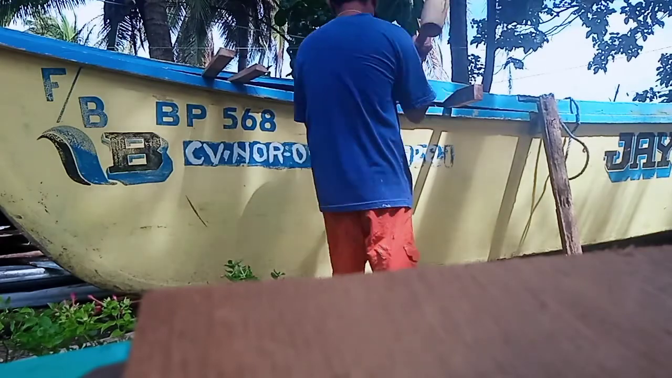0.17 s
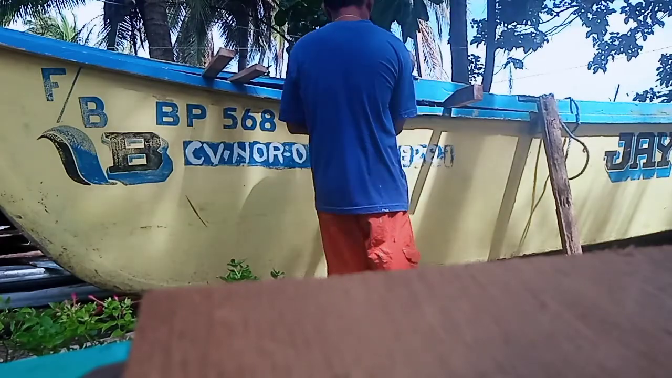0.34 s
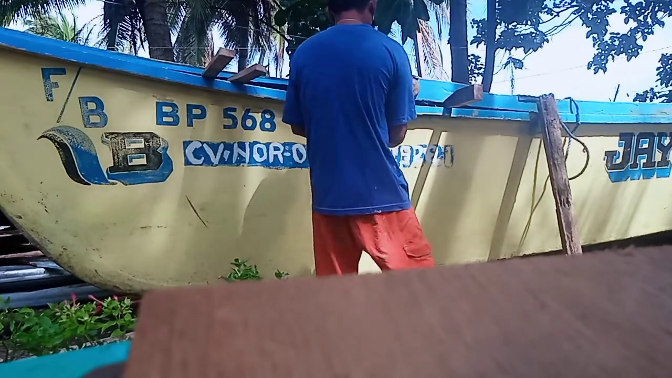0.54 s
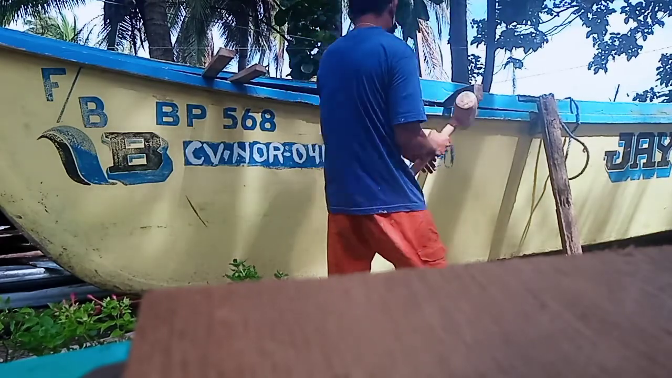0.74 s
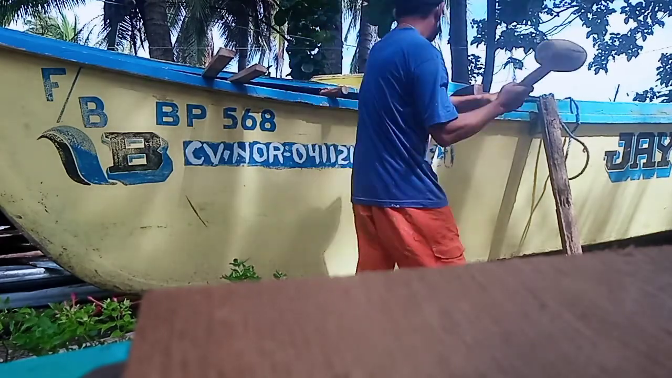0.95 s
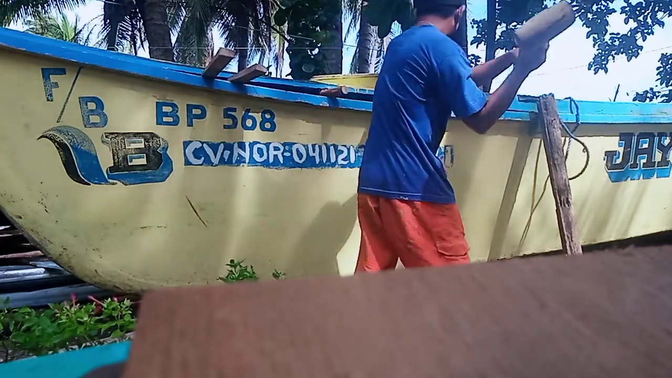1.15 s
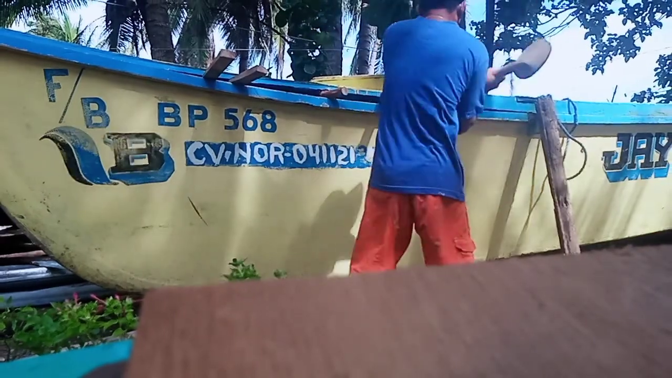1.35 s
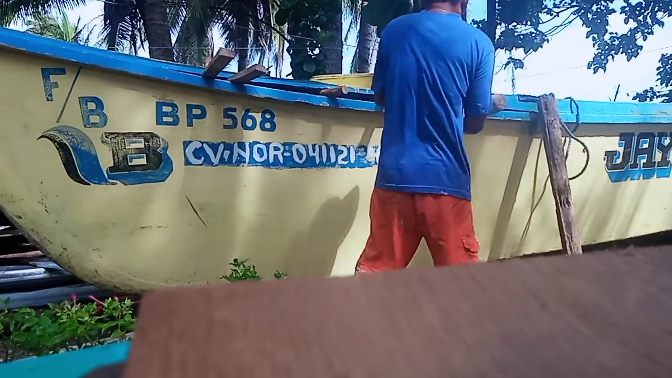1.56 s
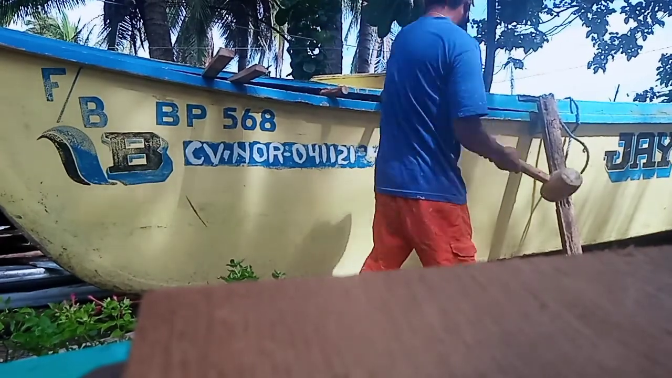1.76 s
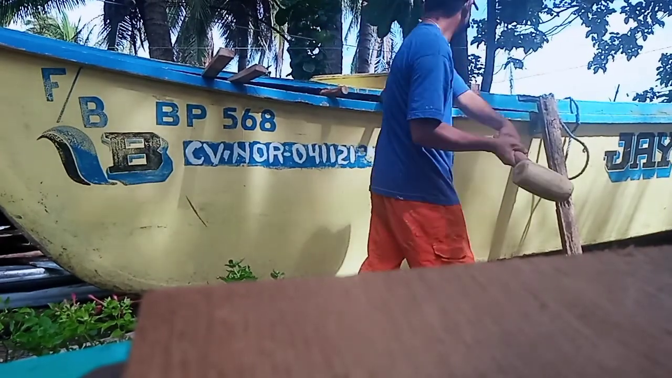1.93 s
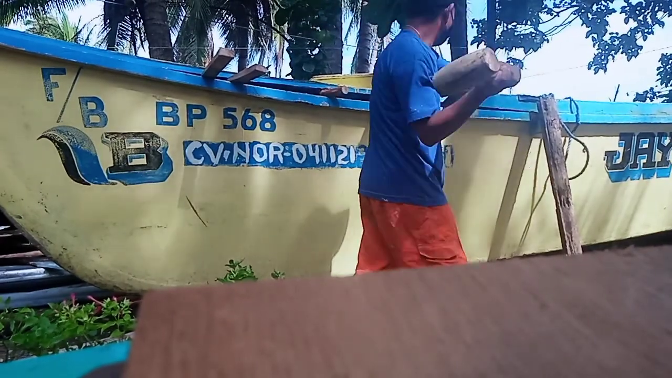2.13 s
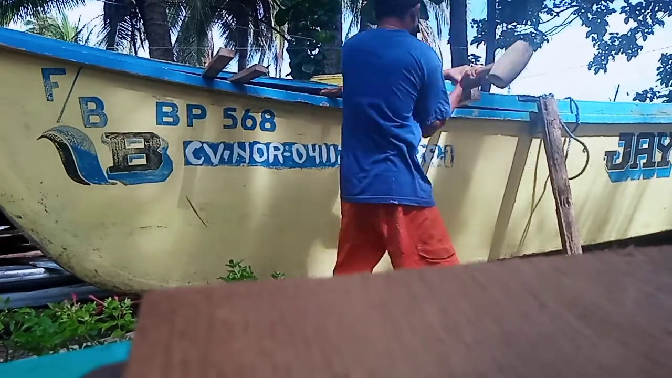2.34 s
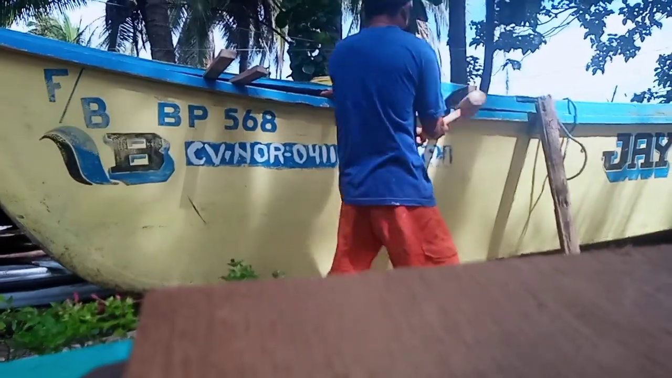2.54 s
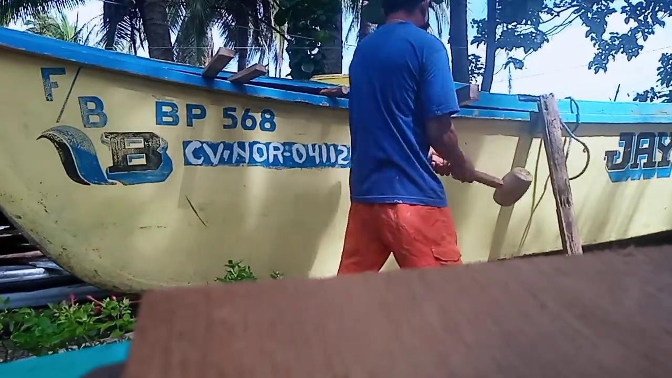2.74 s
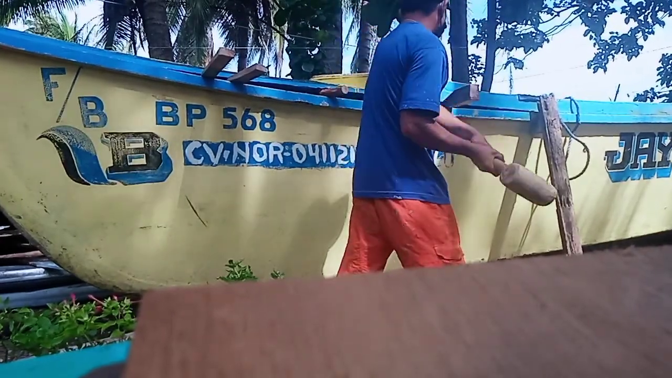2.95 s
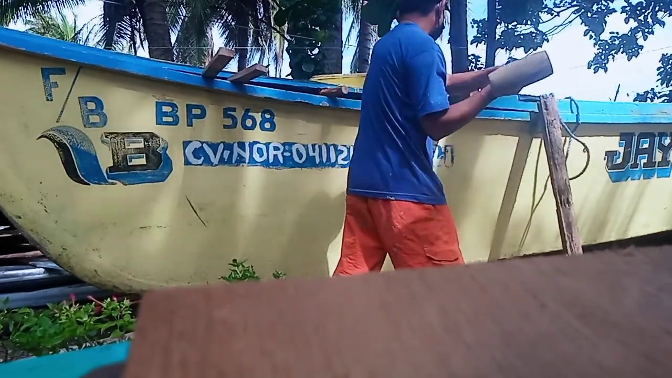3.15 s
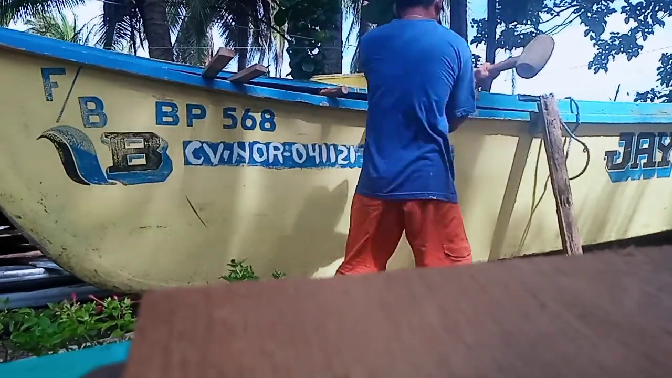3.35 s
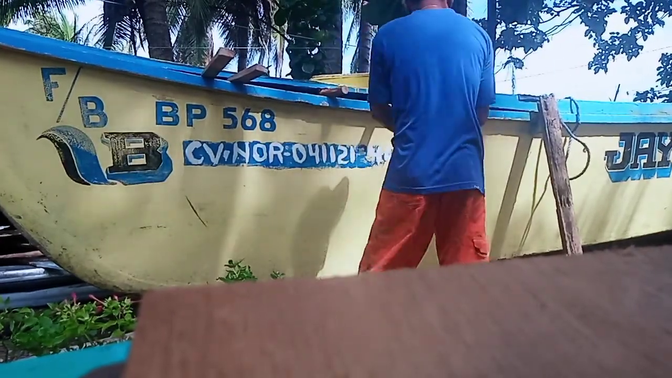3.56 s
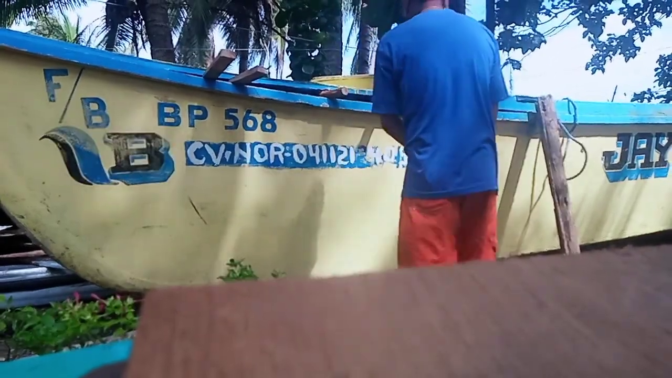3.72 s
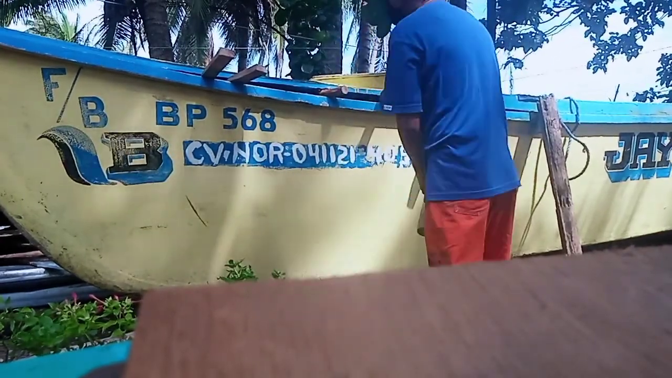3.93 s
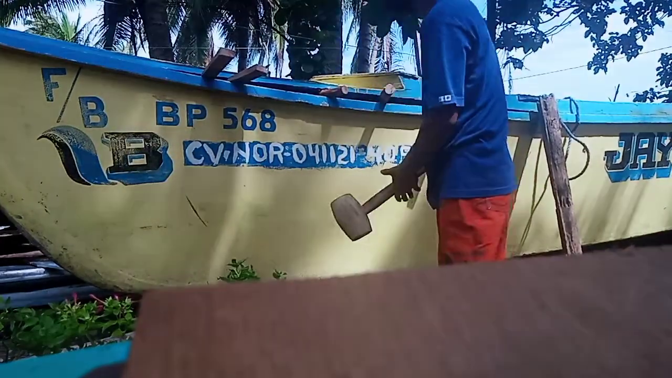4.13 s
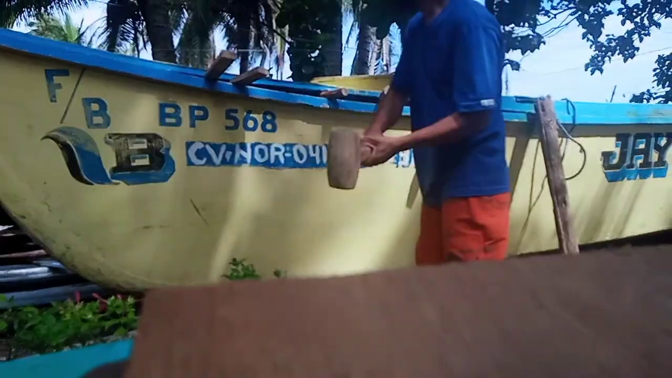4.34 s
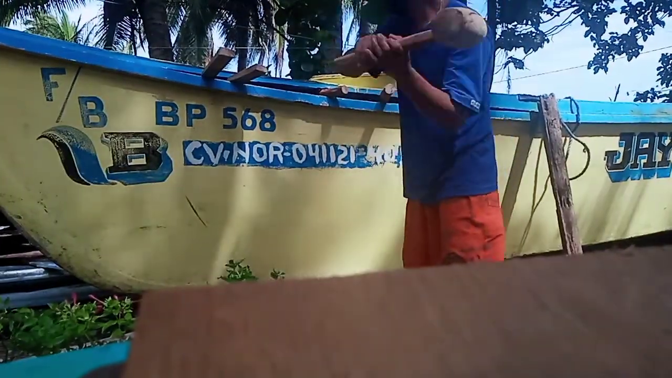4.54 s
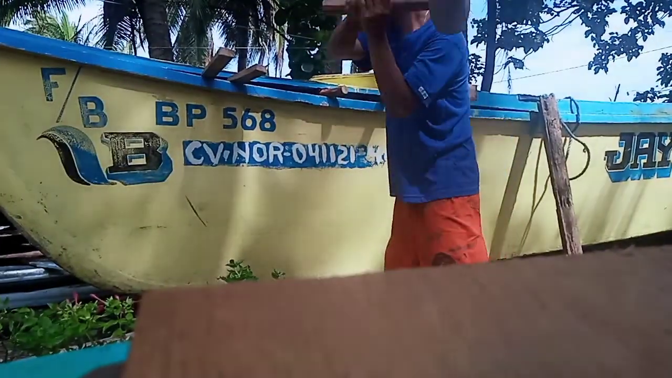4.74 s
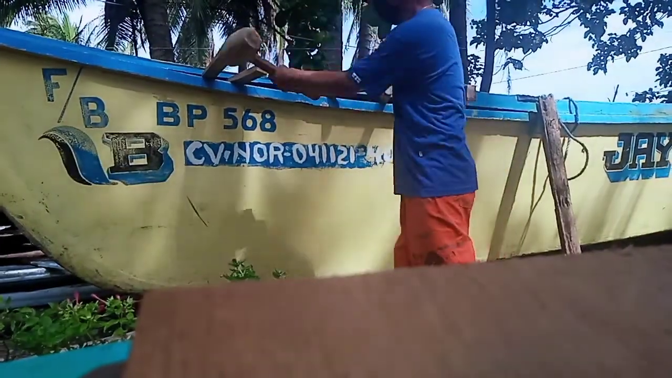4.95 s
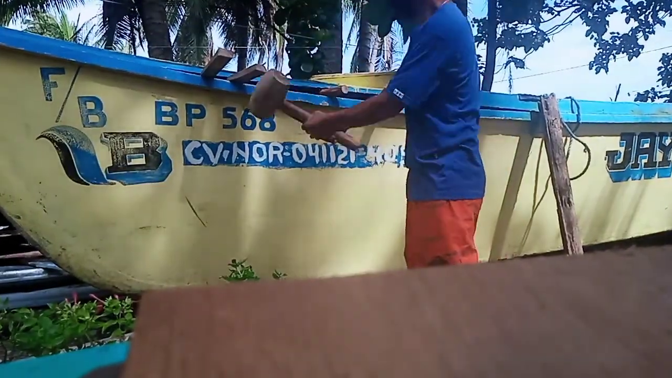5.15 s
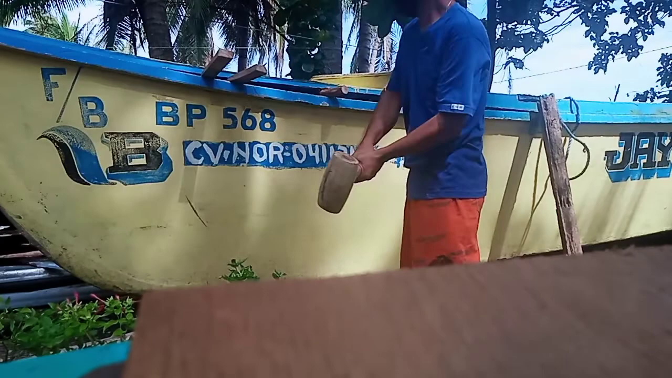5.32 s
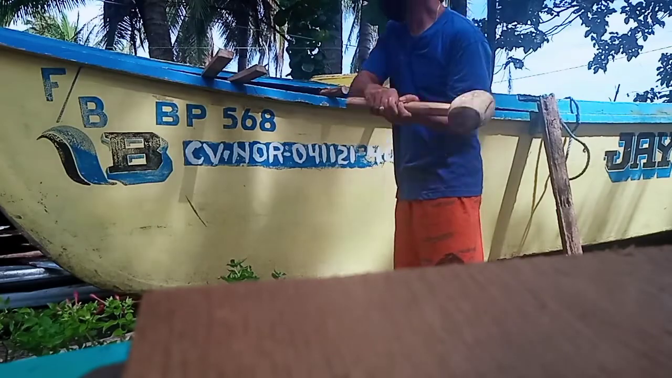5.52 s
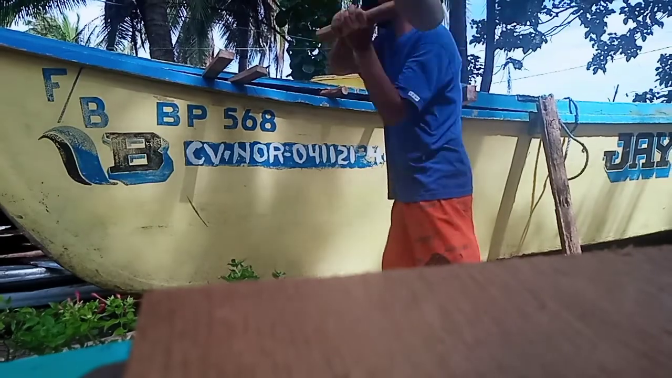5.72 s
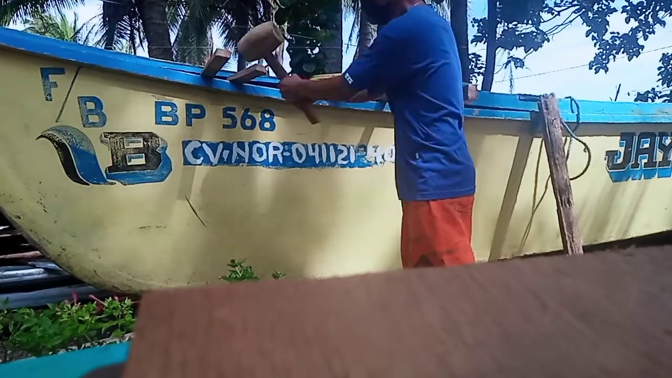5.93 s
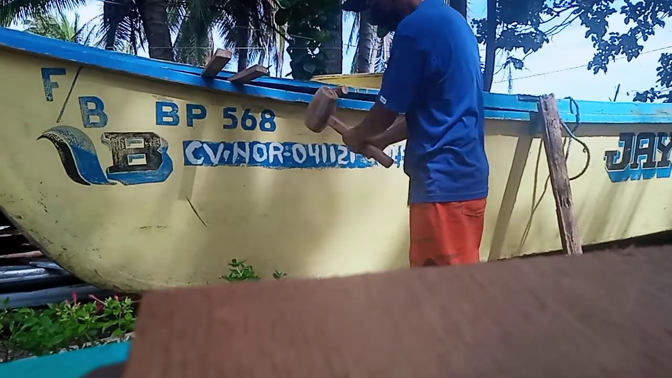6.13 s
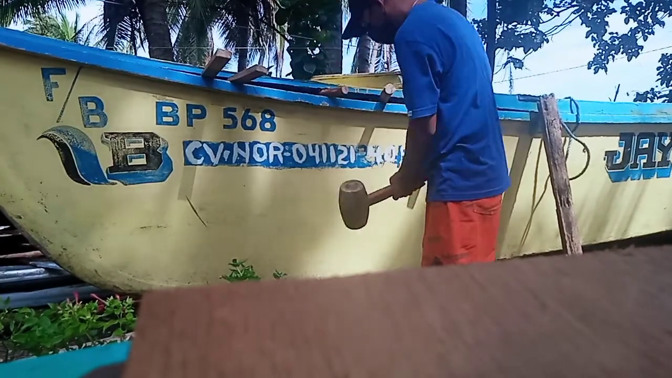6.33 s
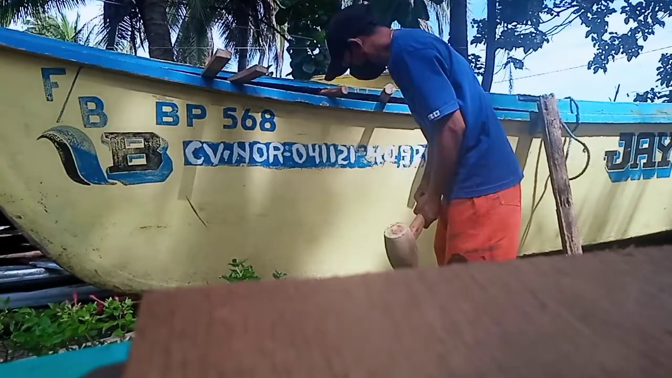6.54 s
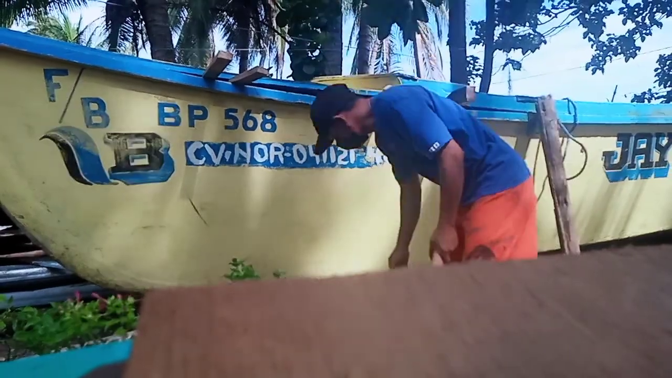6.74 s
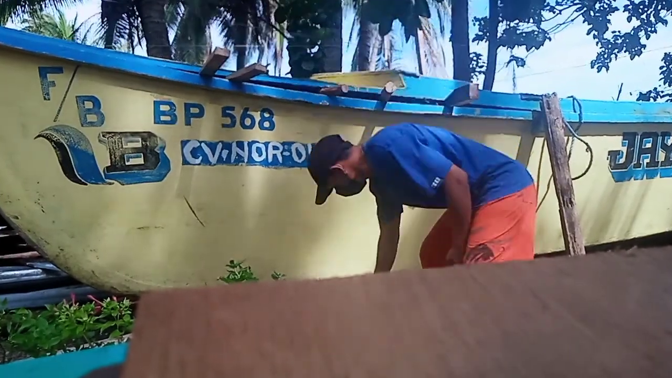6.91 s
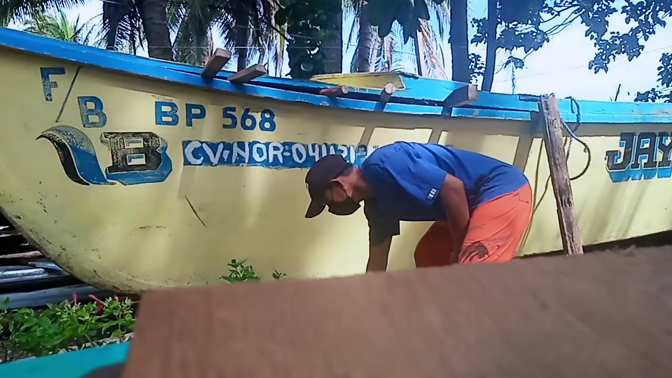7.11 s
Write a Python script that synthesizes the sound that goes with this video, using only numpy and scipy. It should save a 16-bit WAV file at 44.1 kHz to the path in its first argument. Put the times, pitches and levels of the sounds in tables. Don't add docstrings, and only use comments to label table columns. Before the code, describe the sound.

Outdoors by a shore, low surf and rustling leaves hiss quietly while small birds peep. A wooden mallet strikes a boat rail six times, roughly a second apart with a longer gap before the fifth. Each knock is hard and woody, followed by a low hull boom and a brief scattered echo. Faint fowl calls and foot scuffs fall between. A phone some metres away clips on the blows and ducks the background.

```python
import sys
import numpy as np
from scipy import signal
from scipy.fft import rfft, irfft, next_fast_len
from scipy.io import wavfile
from scipy.ndimage import uniform_filter1d

SR = 44100
rng = np.random.default_rng(int(sys.argv[2]) if len(sys.argv) > 2 else 0)


def wav_out(sig):
    wavfile.write(sys.argv[1], SR, np.round(np.clip(np.atleast_2d(sig).T, -1, 1) * 32767).astype(np.int16))


def how_loud(loudness_db):
    steps = np.asarray(loudness_db, float) / 20
    return 10 ** steps


N = 316505

# (frequency [Hz], level [dB per Hz])
SURF_COLOUR = [(15, -72), (25, -33), (69, -10), (102, -4.5), (130, 0.5), (190, -6.5), (232, -16),
               (263, -11), (296, -14), (400, -22.5), (520, -28), (880, -120)]
# (frequency [Hz], level [dB per Hz])
SHORE_COLOUR = [(240, -22.5), (400, -10), (445, -7), (560, -4), (605, -3), (749, -3.5), (1070, -2.5),
                (1220, -1), (2120, -7.5), (3680, -11.5), (4420, -19), (5650, -38.5), (7210, -34.5),
                (9500, -50), (15500, -61)]
# (time [s], strength [-])
BREEZE = [(0, .5), (.5, 0.021), (1.3, 1.9), (2.1, 1.06), (2.9, -0.18), (3.4, 0.0093), (4.0, -0.57),
          (4.6, -1.76), (5.3, -0.74), (5.9, 0.38), (6.4, 0.018), (6.85, 1.8), (7.18, 0.8)]
# (frequency [Hz], change [dB per unit of strength])
BREEZE_LIFT = [(130, -0.2), (1200, 1.33), (2500, 0.9), (3700, 1.85), (7000, 2)]

# (time [s], length [s], frequency [Hz], level [dB])
FOWL = [
    (2.129, 0.22, 1230, -46),
    (2.981, .12, 1780, -47),
    (3.248, .16, 1890, -43.5),
    (3.741, 0.23, 1675, -42),
    (3.856, 0.1, 1974, -38.5),
    (4.42, 0.2, 1190, -51),
    (6.648, 0.48, 1245, -48),
]
# (time [s], level [dB])
PEEPS = [(.02, -49.5), (0.32, -48.5), (.643, -50), (.937, -50.5), (1.355, -53), (6.19, -55), (6.5, -57)]
# (length [s], start [Hz], end [Hz], blur [Hz])
PEEP_SHAPE = (.072, 4620, 3980, 130)
# (time [s], level [dB])
CHIPS = [(.735, -53), (1.004, -51), (1.42, -52), (6.276, -52), (6.545, -52)]
# (length [s], start [Hz], end [Hz], blur [Hz])
CHIP_SHAPE = (.042, 3170, 2800, 110)
# (time [s], level [dB])
PHRASES = [(.3, -69), (0.712, -66), (1.781, -69)]
# (lag [s], length [s], start [Hz], end [Hz], blur [Hz])
PHRASE_NOTES = [
    (0., .11, 5950, 6150, 350),
    (.055, .13, 6550, 6980, 500),
    (.18, .1, 5180, 5150, 350),
]
# (time [s], length [s], level [dB])
TRILLS = [(1.195, 0.38, -65), (2.7, 0.11, -76), (2.95, 0.23, -71), (3.28, 0.26, -78), (4.497, .2, -70)]
# (start [Hz], end [Hz], blur [Hz])
TRILL_SHAPE = (5120, 5300, 220)

# (time [s], level [dB], centre [Hz], width [Hz])
SCUFFS = [(1.84, -65, 6500, 3970), (3.035, -34.5, 1060, 694), (3.035, -44, 2000, 1010),
          (3.859, -36, 975, 300), (3.861, -44, 480, 90), (3.861, -47, 3200, 1800), (3.86, -69, 6500, 3000),
          (4.13, -61, 5500, 4000), (4.3, -58, 1400, 1200), (4.775, -37.5, 3320, 920),
          (4.769, -50, 5600, 4500), (4.77, -70, 12600, 6000), (6.69, -45.5, 3500, 900),
          (6.7, -62, 7000, 2500)]

# (time [s], knock [dB], crack [dB], scattered tail [dB])
BLOWS = [
    (0.4223, 1, -28, -13),
    (1.4878, 6, -8, -12.5),
    (2.4743, 5.5, -5, -13),
    (3.491, 5, 1, -13),
    (5.001, 2, -4.5, -13.5),
    (5.9616, 1.55, -20, -15.5),
]
# (hull against head [dB], tail brightness at 2.5-4.5 kHz [dB])
LANDING = [(-6, -2.2), (-2, 4.5), (0.5, -3.5), (0, -1.5), (-8.5, -1.7), (-5.5, -3)]
SPOT = [0, 1, 1, 1, 2, 2]
PITCH = [1, .94, 1, 1.045, 1, .97]
# (frequency [Hz], level [dB], time to fall 60 dB [s])
HEAD = [
    [(500, -4.5, 0.11), (554, -8, 0.085), (832, -6.5, 0.087), (1106, 0, 0.048), (1240, -10, 0.037),
     (1564, -9.5, 0.067), (2140, -21, 0.033), (3620, -31, .02)],
    [(493.5, -10.5, 0.093), (657, -8, 0.036), (900, -11.5, 0.052), (1033, 4, 0.023), (1250, -3.5, 0.019),
     (1430, -16.5, 0.087), (1888, -10, 0.031), (3050, -20, 0.056), (3430, -8.5, 0.011), (5360, -18, 0.011)],
    [(521, -7.5, 0.061), (628, -3.5, 0.03), (717, 0.5, 0.038), (870, -25, 0.042), (948, -0.5, 0.041),
     (1030, -6, 0.06), (1430, -10.5, 0.041), (1800, -14.5, 0.052), (2660, -14, 0.021), (3600, -10.5, 0.024)],
]
RISE_S = [0.0026, 0.00094, 0.0014]
# (lag [s], level [dB])
EARLY = [
    (-.003, -39.5),
    (.0175, -9.5),
    (.024, -13),
    (.039, -37),
]
# (frequency [Hz], level [dB], time to fall 60 dB [s])
HULL = [
    [(61.3, -7, 0.59), (73.6, -9, 0.7), (108.7, 2.5, 0.43), (126, 4.5, 0.27), (151, 2, 0.38),
     (188, -6, 0.34), (252.3, -6.5, 0.33), (331, -16, 0.18)],
    [(63.45, -17.5, 0.71), (90, -24, 0.87), (115, -23, 0.84), (125.5, 11, 0.065), (138.4, -11.5, 0.63),
     (161.2, -9.5, 0.28), (210.6, -12, 0.17), (282, -9.5, 0.14)],
    [(59.2, -6.5, 0.9), (88.7, -1, 0.29), (114.6, -3.5, 0.26), (145.7, -2.5, 0.36), (183.5, -17, 0.44),
     (234, -21, 0.11), (264, -20, 0.4), (336.2, -2, 0.25)],
]
HULL_LAG_S = [0.0096, 0.00636, 0.00735]
# (lag [s], level [dB])
SHED = [
    [(.045, -22), (.07, -9.5)],
    [(.062, -13.5), (.092, -15)],
    [(.07, -13), (.1, -22)],
]
RUMBLE_DB = [-41, -29.5, -29.5]
RUMBLE_HZ = [50, 170]
# (frequency [Hz], level [dB per Hz])
TAIL = [
    [(110, -36), (190, 1.5), (377, -11), (527, -9.5), (970, -14.5), (1600, -20), (3350, -25)],
    [(110, -23.5), (200, 4), (350, -14), (480, -14), (750, -17), (1260, -15.5), (2230, -25.5),
     (3350, -27.5)],
    [(110, -36), (180, -9), (380, -12.5), (507, 0.5), (600, -9.5), (760, -8), (1900, -15), (3350, -18.5)],
]
# (frequency [Hz], level under its last point [dB])
TAIL_TOP = [(4300, -7), (5300, -27.5), (7000, -26), (9300, -42), (10500, -51), (15000, -55.5)]
# (frequency [Hz], time to fall 60 dB [s])
TAIL_T60 = [(250, 0.32), (500, 0.29), (1000, 0.46), (2000, 0.47), (3500, 0.43), (8000, 0.53)]
# (time after the blow [s], level [dB])
EDGE = [(.11, -6), (.17, -3.5), (0.13, -4.5)]
WALL_DB = [-51, -33.5, -29.5]

LEAD_S = .005
CLIP = .95


def unit(x):
    return x / np.sqrt(np.mean(x ** 2))


def read(table, hz):
    f, v = np.transpose(table)
    return np.interp(np.log(hz), np.log(f), v)


def fall(t, t60):
    return (t >= 0) * np.exp(-np.log(1000) * np.maximum(t, 0) / t60)


def hiss(size, order, hz, kind="low"):
    return signal.lfilter(*signal.butter(order, hz, kind, fs=SR), rng.standard_normal(size))


def bands(table, size):
    hz = np.maximum(np.arange(size // 2 + 1) * SR / size, 1)
    noise = rfft(rng.standard_normal(size)) * how_loud(read(table, hz))
    noise = noise / np.sqrt(np.mean(irfft(noise, size) ** 2))
    for centre in 2 ** np.arange(5, 14.5, .5):
        share = np.clip(1 - 2 * abs(np.log2(hz / centre)), 0, 1)
        yield centre, irfft(noise * share, size)


def walk(rate, size):
    k = int(SR / rate)
    steps = np.repeat(rng.standard_normal(size // k + 1), k)
    smooth = uniform_filter1d(uniform_filter1d(steps, k), k)
    return unit(smooth[:size])


def add(out, s, x):
    i = int(s * SR)
    out[i:i + len(x)] += x[:len(out) - i]


def shore(colour, level_db):
    breeze = np.interp(np.arange(N) / SR, *np.transpose(BREEZE))
    out = np.zeros(N)
    for hz, x in bands(colour, next_fast_len(N, True)):
        out += x[:N] * how_loud(read(BREEZE_LIFT, hz) * breeze + 1.68 * walk(9, N))
    return how_loud(level_db) * out


def whistle(length, start_hz, end_hz, blur_hz):
    u = np.arange(int(length * SR)) / (length * SR)
    smear = unit(hiss(SR // 2, 2, blur_hz))[-len(u):]
    strength = unit(130 / blur_hz + smear)
    glide_hz = start_hz + (end_hz - start_hz) * u
    return np.sin(np.pi * u) * strength * np.sin(2 * np.pi * np.cumsum(glide_hz) / SR)


def birds():
    out = np.zeros(N)
    for s, length, hz, db in FOWL:
        add(out, s, how_loud(db) * whistle(length, hz, hz * 0.96, 111))
    for s, db in PEEPS:
        add(out, s, how_loud(db) * whistle(*PEEP_SHAPE))
    length, start_hz, end_hz, blur_hz = CHIP_SHAPE
    for s, db in CHIPS:
        octave = how_loud(-15) * whistle(length, 2 * start_hz, 2 * end_hz, blur_hz)
        add(out, s, how_loud(db) * (whistle(*CHIP_SHAPE) + octave))
    for s, db in PHRASES:
        for lag, *note in PHRASE_NOTES:
            add(out, s + lag, how_loud(db) * whistle(*note))
    for s, length, db in TRILLS:
        add(out, s, how_loud(db) * whistle(length, *TRILL_SHAPE))
    return out


def scuffs():
    out = np.zeros(N)
    t = np.arange(SR // 2) / SR
    for s, db, hz, width_hz in SCUFFS:
        rub = hiss(len(t), 3, [hz - width_hz / 2, hz + width_hz / 2], "band")
        add(out, s, how_loud(db) * unit(rub) * np.minimum(t / 0.014, 1) * fall(t, 0.32))
    return out


def wall_echo(t):
    late = t - 0.305
    dull = hiss(len(t), 3, [85, 720], "band")
    return unit(dull) * fall(late, 0.17) * np.clip(late / 0.015, 0, 1)


def scattered_tail(t, spot, bright_db):
    colour = TAIL[spot] + [(hz, db + TAIL[spot][-1][1]) for hz, db in TAIL_TOP]
    tail = np.zeros(len(t))
    for hz, x in bands(colour, len(t)):
        if hz > 150:
            clumps_db = 1.8 * walk(85.6, len(t)) + bright_db * (2500 < hz < 4500)
            tail += x * how_loud(clumps_db) * fall(t, read(TAIL_T60, hz))
    tail = how_loud(-17) * unit(signal.lfilter(*signal.butter(2, 189, "high", fs=SR), tail))
    air = hiss(len(t), 2, 9000, "high") * fall(t, 0.39) * how_loud(2.5 * walk(60, len(t)))
    return (tail + how_loud(-45.5) * air) * (1 - np.exp(-np.maximum(t, 0) / 0.0045))


def rumble(t):
    return unit(hiss(len(t), 2, RUMBLE_HZ, "band")) * fall(t, 1.7) * np.clip(t / 0.06, 0, 1)


def ringing(t, table):
    return sum(how_loud(db) * np.sin(2 * np.pi * hz * t) * fall(t, t60) for hz, db, t60 in table)


def hull_boom(t, spot):
    late = t - HULL_LAG_S[spot]
    boom = ringing(late, HULL[spot]) * (1 - np.exp(-np.maximum(late, 0) / 0.0043))
    boom = boom + sum(how_loud(db) * np.interp(t - lag, t, boom) for lag, db in SHED[spot])
    return boom * how_loud(0.87 * walk(22, len(t)))


def mallet_knock(t, spot, pitch, knock_db, crack_db):
    tones = [(hz * (pitch if hz > 560 else 1), db, t60) for hz, db, t60 in HEAD[spot]]
    crack = hiss(len(t), 2, [2400, 4800], "band") * fall(t, 0.013)
    splinters = hiss(len(t), 2, 6000, "high") * fall(t, 0.0067)
    crack = crack + how_loud(-32.5) * splinters
    rise = 1 - np.exp(-t / RISE_S[spot])
    knock = rise * (how_loud(knock_db) * ringing(t, tones) + how_loud(crack_db) * crack)
    return knock + sum(how_loud(db) * np.interp(t - lag, t, knock) for lag, db in EARLY)


def blow(spot, pitch, knock_db, crack_db, tail_db, boom_db, bright_db):
    t = np.arange(2 ** 15 + 2 ** 14) / SR - LEAD_S
    edge_s, edge_db = EDGE[spot]
    edge = how_loud(edge_db * np.clip((t - edge_s) / 0.027, 0, 1))
    out = how_loud(WALL_DB[spot]) * wall_echo(t)
    out += how_loud(tail_db + 9) * scattered_tail(t, spot, bright_db) * edge
    out += how_loud(RUMBLE_DB[spot]) * rumble(t)
    out += how_loud(knock_db + boom_db) * hull_boom(t, spot) * edge
    return out + mallet_knock(t, spot, pitch, knock_db, crack_db)


def scene():
    out = shore(SURF_COLOUR, -42) + shore(SHORE_COLOUR, -44.5) + birds() + scuffs()
    for spot, pitch, (s, *levels), landing in zip(SPOT, PITCH, BLOWS, LANDING):
        add(out, s - LEAD_S, blow(spot, pitch, *levels, *landing))
    return out[None]


def duck(t):
    dip = np.interp(-t, [0.0012, 0.0024, 0.018, 0.027], [0.0047, 1, 0.51, 0])
    grab = 1 - np.exp(-np.maximum(t, 0) / 0.0079)
    release = np.exp(-np.maximum(t - 0.061, 0) / 0.064)
    return -13 * dip - 8.5 * grab * release


def band_limit(x):
    return signal.sosfilt(signal.butter(12, 16530, fs=SR, output="sos"), x)


def record(dry):
    duck_db = sum(duck(np.arange(N) / SR - row[0]) for row in BLOWS)
    x = dry + how_loud(-82) * rng.standard_normal(N)
    x = signal.lfilter(*signal.butter(2, 50.7, "high", fs=SR), x)
    x = x * how_loud(duck_db) / CLIP
    x = CLIP * x / (1 + abs(x) ** 30) ** (1 / 30)
    x = signal.lfilter(*signal.butter(1, 9000, fs=SR), x)
    x = signal.sosfilt(signal.ellip(8, .1, 60, 16000, fs=SR, output="sos"), x)
    return band_limit(x)


dry = scene()
out = record(dry)
wav_out(out)
```